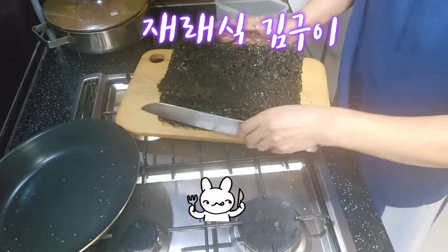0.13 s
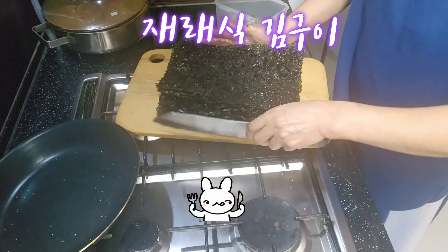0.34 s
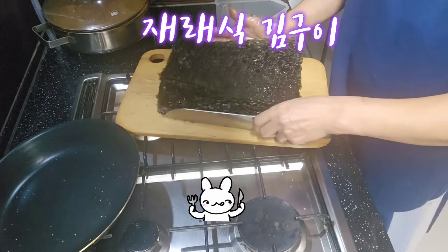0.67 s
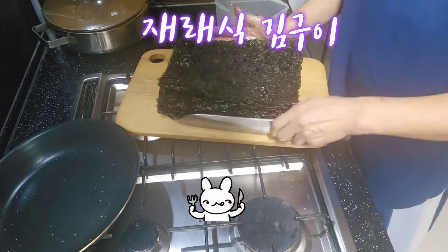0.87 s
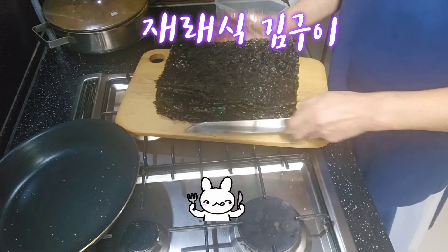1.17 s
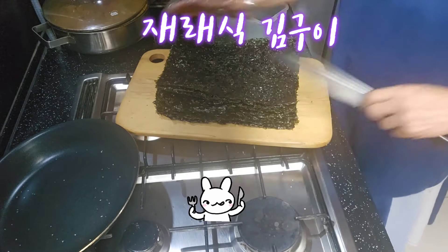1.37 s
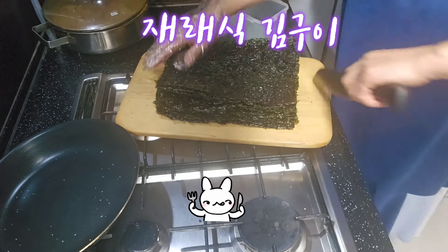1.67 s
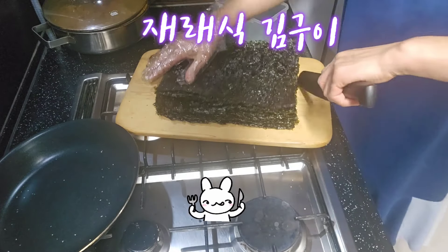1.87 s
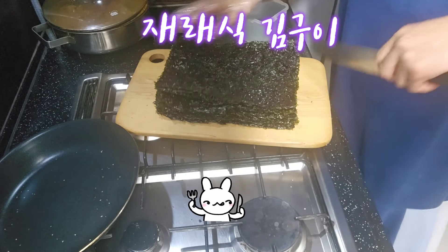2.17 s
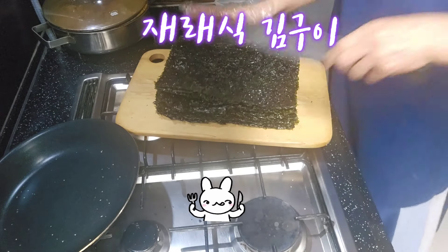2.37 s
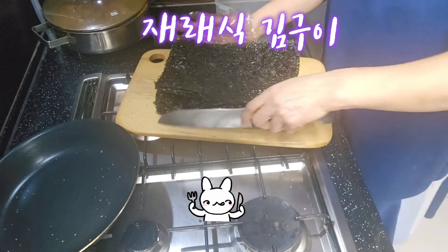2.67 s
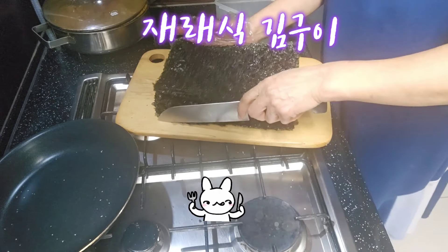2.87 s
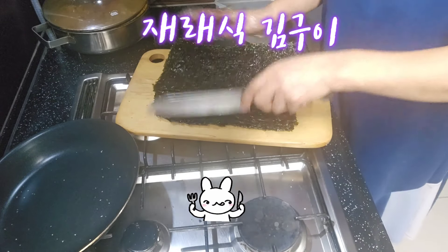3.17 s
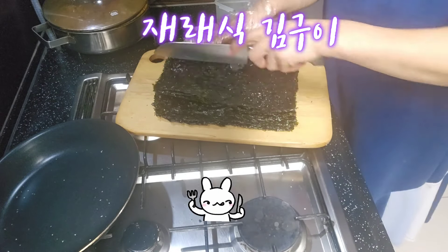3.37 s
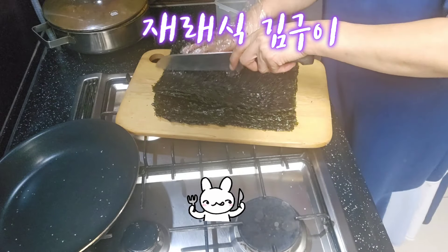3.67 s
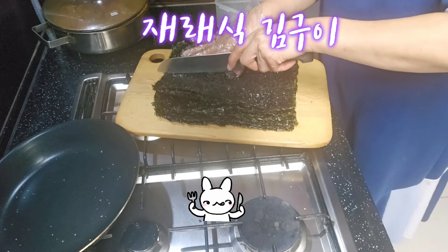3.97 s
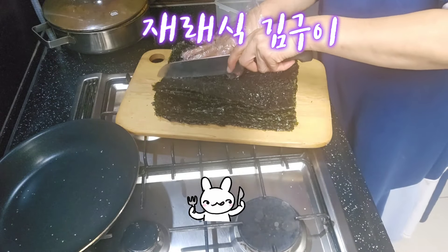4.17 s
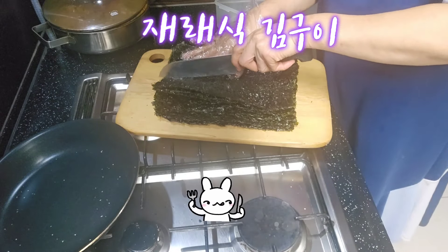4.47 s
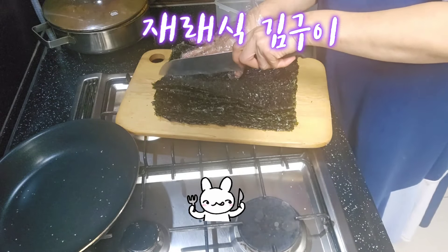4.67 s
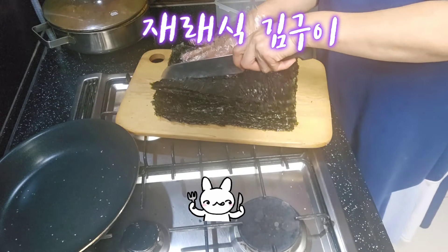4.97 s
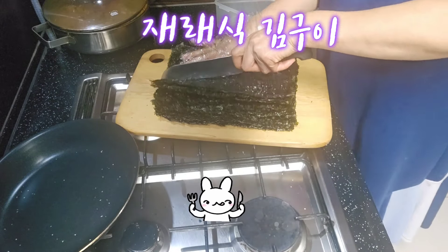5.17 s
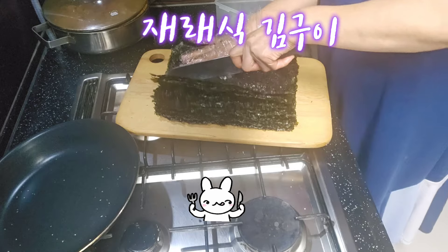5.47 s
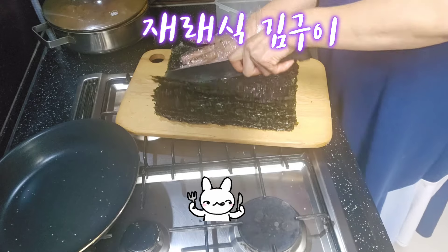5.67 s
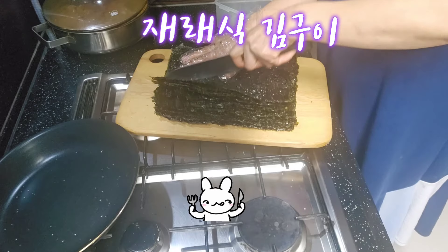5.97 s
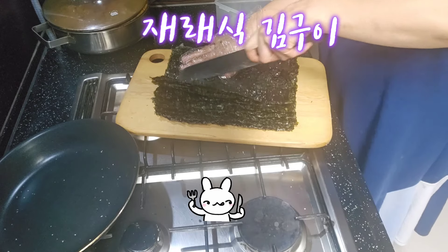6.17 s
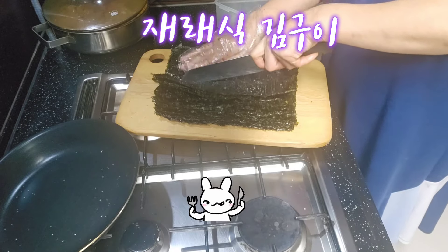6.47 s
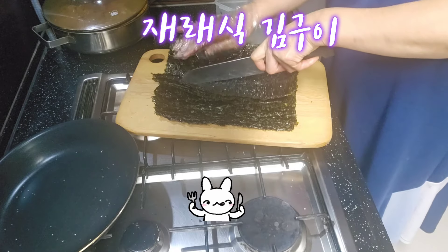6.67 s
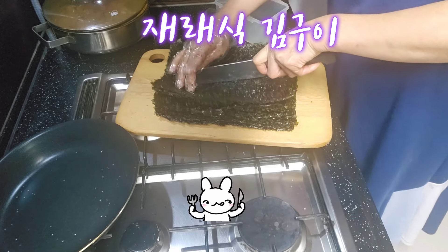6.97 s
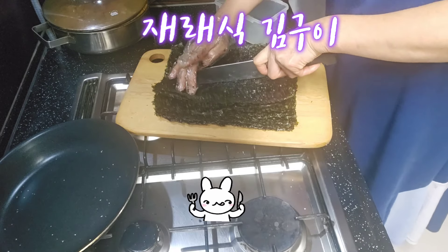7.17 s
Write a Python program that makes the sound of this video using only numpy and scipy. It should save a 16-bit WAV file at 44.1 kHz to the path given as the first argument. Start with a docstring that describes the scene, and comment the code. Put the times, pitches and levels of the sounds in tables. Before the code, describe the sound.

Dry, papery crackling of stacked seaweed sheets, handled and cut on a board, slightly left of nearby microphones. A dull knock lands early, some brief scraping drags follow, then a cluster of hard, hollow knocks peaks before the middle. Afterwards come sparser taps, short crunches and fine clicking snaps, and the blade sings faintly. Low fridge hum and quiet room air lie beneath, with a short, dull kitchen echo.

```python
"""A refrigerator hums in a small kitchen while hands rustle a stack of crisp dry seaweed that a knife cuts.
From the start come knocks, perhaps of pots or by someone else nearby, which ring damped tones in a hard body.
Sheets snap as short noise ticks; from 0.5 s brief narrow tones join in, from 0.7 s a few drags of dense slips.
The hardest knock and crunch come near 2.4 s; from 3.1 s the blade rings faintly four times as a wavering sine.
Fewer knocks follow, while crunches and snaps (random clicks and noise, filtered) go on to the end."""
import sys
import numpy as np
from scipy import signal
from scipy.fft import rfft, irfft, next_fast_len
from scipy.io import wavfile

SR = 44100
rng = np.random.default_rng(int(sys.argv[2]) if len(sys.argv) > 2 else 0)


def wav_out(sig):
    """Save sig, one row per channel (or a flat mono array), as 16-bit PCM at SR to the path in sys.argv[1]."""
    wavfile.write(sys.argv[1], SR, np.round(np.clip(np.atleast_2d(sig).T, -1, 1) * 32767).astype(np.int16))


N = 323253

# room air: (pitch [Hz], relative level [dB per Hz])
AIR_SPECTRUM = [(13, -39.5), (22, -5), (112, 5.5), (140, -10), (169, -12), (236, -1.5), (302, -9),
                (618, -13), (1040, -30), (1380, -23.5), (1760, -30.5), (5460, -34.5), (10300, -46),
                (11500, -32), (16000, -46)]
# steady rustle of hands on the sheets: (time [s], level [dB], lift of the large dull flakes [dB])
HAND_RUSTLE = [(0, -80, 0), (.27, -75.5, 1.5), (.47, -66, -4.5), (.72, -57.5, -0.5), (.92, -73, -6),
               (1.14, -64.5, -1.5), (1.36, -83, 7), (2.0, -75, 4.5), (2.32, -71, 4), (2.64, -62.5, 1),
               (3.2, -71, 0.5), (4.08, -83, -0.5), (4.4, -74, -3.5), (5.0, -79, 1), (5.3, -70, -2),
               (5.72, -73, -1), (5.87, -84.5, 3.5), (5.95, -63, -5), (6.65, -62, -6), (6.72, -67, -4.5),
               (6.95, -64, -6.5), (7.18, -80, -3), (7.33, -68, -5)]
# crunches of the stack: (peak time [s], peak level [dB], fade by 60 dB [s], lift of the large dull flakes [dB])
STACK_CRUNCHES = [(.075, -64.5, .35, 1.5), (.345, -58, .2, -5), (.52, -55.5, .2, -6.5),
                  (.605, -44.5, .3, -4.5), (.845, -51, .35, -4.5), (.965, -57, .5, -1),
                  (1.055, -55.5, .5, -3.5), (1.32, -72.5, .2, 5), (2.155, -54, .3, 3),
                  (2.385, -35.5, 0.15, 12), (2.432, -46.5, .25, 8), (2.762, -48, .15, -9),
                  (2.805, -49.5, .5, 0.5), (2.972, -45.5, .5, -5), (3.09, -54.5, .35, -0.5),
                  (3.325, -50, .5, -3), (3.49, -59, .3, -2), (3.732, -67, .3, -3), (4.115, -61.5, .15, 3),
                  (4.222, -53, .45, -4.5), (4.67, -68.5, 1.2, -2), (5.115, -56.5, .3, 1),
                  (5.19, -45.5, .2, -7.5), (5.28, -55.5, .35, -7.5), (5.407, -53.5, .15, -6.5),
                  (5.518, -51, .15, -9), (5.645, -63, .12, -8.5), (6.468, -53.5, .35, -9),
                  (6.885, -61, .4, -5), (7.09, -65, .3, -8), (7.228, -57, .2, -11), (7.302, -52, .3, -7)]
# colour of the rustle: (pitch [Hz], relative level [dB per Hz])
SHEET_SPECTRUM = [(600, -26.5), (900, -7.5), (1440, -3.5), (2000, -5.5), (3000, -3.5), (4500, -3.5),
                  (5700, -3.5), (7300, -4), (10000, -8.5), (13000, -2.5), (16000, -7)]
# knocks: (time [s], level [dB], favoured pitch [Hz], lift of that pitch [dB],
# then set against the level: thud [dB], low modes [dB], high modes [dB], crack [dB]; rattle fade by 60 dB [s])
# knocks() adds fixed offsets to the levels
KNOCK_EVENTS = [(0.069, -41, 560, 19, -3, -7.5, -11, -26, 0.057),
                (0.328, -59, 1380, 11, -7, -0.5, -24, 1, 0.06),
                (0.49, -51, 686, 4.9, -6, -1, -44, -16, 0.13),
                (0.602, -15, 260, 12.8, -6, -6.5, -17, -25, 0.021),
                (0.766, -42.5, 1440, 15, -7, -20, -3.5, -32, 0.067),
                (0.962, -53, 1450, 6.6, -8, -4, -3, -5, 0.049),
                (1.051, -34, 1800, 7.4, -13, -13, -32, -26, 0.046),
                (1.305, -46.5, 1310, 14, -28, -6, -4.5, -5.5, 0.031),
                (1.544, -51, 550, 10, -24, -14, -18, -7, 0.033),
                (1.656, -49, 1440, 6.3, -29, -7, -17, -28, 0.039),
                (2.052, -29.5, 515, 3.8, -17, -9, -37, -26, 0.078),
                (2.119, -31.5, 1690, 19.6, -15.5, -5.5, -15.5, -24, 0.06),
                (2.379, 3, 1120, 6.1, -35, -12, -14, -18.5, 0.041),
                (2.409, -14, 727, 6.9, -22, -1, -3, -13, 0.036),
                (2.429, -16.5, 664, 5, -16.5, -8.5, -21, -4, 0.037),
                (2.449, -16, 1180, 7.8, -20.5, -10, -10.5, -18, 0.07),
                (2.638, -46.5, 500, 10, 4.5, -3.5, -6, -12.5, 0.036),
                (2.798, -15, 1550, 4.5, -28.5, -12.5, -15.5, -21.5, 0.087),
                (3.223, -29, 619, 4, -22, -13, -27.5, -33, 0.17),
                (4.106, -26, 694, 6.1, -24, -8, -21, -17.5, 0.071),
                (4.116, -37.5, 1440, 10, -0.5, -12, -12, -32.5, 0.059),
                (4.164, -42.5, 518, 11, -2, -8, -17, -10, 0.053),
                (5.12, -25.5, 642, 10, -22.5, -8.5, -22.5, -18.5, 0.083),
                (5.383, -46, 638, 19.2, 4.5, -1.5, -24, -5, 0.028),
                (6.875, -54, 1326, 9, -28, -24.5, -8, -6.5, 0.053)]
# what the knocks and drags set ringing: (pitch [Hz], relative level [dB], fade by 60 dB [s])
BODY_MODES = [(250, -9.5, 0.086), (311, -13.5, 0.09), (434.8, -6.5, .06), (520, -6.5, 0.095),
              (629, -3, 0.074), (727, -4, 0.069), (828, -14.5, 0.12), (918, -4.5, 0.036),
              (1040, -14.5, 0.098), (1170, -3.5, 0.027), (1351, -16, 0.061), (1400, -7.5, 0.055),
              (1474, -9, .035), (1535.6, -2.5, 0.061), (1690, -10, 0.049), (1929, -1, 0.019),
              (2088, -4.5, 0.037), (2330, -4.5, .03), (2546, -11, 0.067), (2940, -19.5, 0.015)]
# the clearest single breaks: (time [s], level before a fixed cut [dB], pitch of the tick [Hz])
CLEAR_SNAPS = [(0.2888, -52, 3500), (0.391, -56, 11600), (0.7206, -40, 5500), (0.839, -43, 11900),
               (0.952, -54, 3820), (1.513, -50, 3930), (1.597, -49.5, 3450), (1.901, -49, 12400),
               (1.9754, -43.5, 5470), (2.1316, -36.5, 4930), (2.757, -45, 12100), (2.9475, -38, 7300),
               (2.967, -38, 6440), (3.314, -39, 7300), (3.41, -46, 5240), (3.573, -48.5, 3160),
               (3.5982, -48.5, 9330), (3.7284, -48, 7500), (4.545, -48, 7500), (4.834, -50, 5410),
               (5.0457, -48.5, 7400), (5.1806, -32.5, 11800), (5.5024, -42, 7700), (5.5168, -39.5, 5610),
               (5.644, -45, 9580), (5.6885, -50, 12500), (5.7216, -45.5, 3260), (5.7782, -49, 4540),
               (6.067, -39.5, 5000), (6.1949, -47, 8000), (6.283, -48, 5980), (6.3275, -47, 7990),
               (6.7346, -50, 5500), (6.8748, -43.5, 7270), (7.222, -42, 11260), (7.2963, -37, 11450)]
# brief narrow tones: (start [s], fade by 60 dB [s], pitch [Hz], level [dB])
NARROW_TONES = [(.492, 0.18, 1400, -50.5), (0.76, 0.16, 1398, -41), (.762, 0.14, 2046, -43),
                (.80, 0.39, 1345, -52.5), (1.054, 0.057, 1790, -35), (1.671, 0.6, 520, -58),
                (1.878, 0.38, 520, -57), (2.119, 0.5, 1587, -39.5), (2.217, 0.4, 211, -33),
                (3.29, 0.28, 7500, -53), (4.115, 0.087, 1436, -28.5), (5.126, 0.11, 1415, -32.5),
                (5.125, 0.1, 690, -30), (5.392, 1.36, 634, -67)]
# something dragged over the worktop: (full at [s], hold [s], fade by 60 dB [s], scrape [dB], rumble [dB])
WORKTOP_DRAGS = [(.72, .27, .3, -65.5, -67.5), (1.03, .04, .8, -64.5, -58), (2.056, .05, .3, -52.5, -45),
                 (2.125, .03, .55, -48, -43.5), (2.352, .01, .1, -44.5, -43.5)]
# the blade sings as it slides: (full at [s], hold [s], fade by 60 dB [s], level [dB])
BLADE_SWELLS = [(3.127, 0.051, .4, -71.5), (4.225, 0.053, 0.62, -60), (6.667, 0.024, 0.094, -66),
                (7.08, .02, 0.078, -72)]
# how alike the two sides are: (pitch [Hz], likeness [0 to 1])
SIDE_LIKENESS = [(60, 0.95), (180, 0.71), (550, .5), (1650, 0.25), (5000, 0.16), (9000, 0.55),
                 (15000, 0.44)]
# phase lag of the right side by pitch: (pitch [Hz], lag [radians])
RIGHT_LAG = [(250, 0), (1100, .6), (2400, 1.3), (4100, 2.9), (6900, 2 * np.pi)]

AIR_DB = -62.5
HUM_HZ, HUM_DB = 119, -67.5
CRUNCH_RISE_SHARE = .4   # climbing 60 dB takes this share of the fading time
PUFF_SAMPLES = 6000   # length of one puff of noise
STRAY_SNAPS = 45   # lesser breaks at random moments
STRAY_OVER_DB, STRAY_SPREAD_DB = 13, 6   # above the steady rustle's level, before the fixed cut
SNAP_T60_S = .028
DRAG_RISE_S = 0.073   # to climb 60 dB
BLADE_HZ, BLADE_RISE_S = 5740, 0.13   # the rise climbs 60 dB
KITCHEN_T60_S, WALL_CUT_HZ, KITCHEN_DB = 0.39, 2000, -13.5   # fading time before the walls dull it
LEFT_DB = 1.54   # left over right: the work lies left of the microphones
PORT_HZ, PORT_T60_S, PORT_DB = 11600, 0.0051, -24.5   # resonance of the microphone ports
CUTOFF_HZ = 15850


def from_db(db):
    """Turn decibels into a gain."""
    return 10 ** (np.asarray(db) / 20)


def rms_one(x):
    """Scale a sound to an average strength (rms) of 1."""
    return x / np.sqrt(np.mean(x ** 2) + 1e-20)


def every_sample(coarse):
    """Fill in a control given at every 40th sample."""
    return np.interp(np.arange(N) / 40, np.arange(len(coarse)), coarse)


def gain_curve(rows, column=1):
    """Join the points of a dB column into a gain at every 40th sample."""
    rows = np.array(rows)
    times = np.arange(0, N + 40, 40) / SR
    return from_db(np.interp(times, rows[:, 0], rows[:, column]))


def swell(full_s, rise_s, hold_s, t60):
    """Gain at every 40th sample: climbs 60 dB in rise_s, holds from full_s on, then dies away."""
    t = np.arange(0, N + 40, 40) / SR - full_s
    rising = -t / rise_s
    fading = np.maximum(t - max(hold_s, 0), 0) / t60
    return from_db(-60 * np.maximum(rising, fading))


def at_hz(points, hz):
    """Read a pitch table, with pitch on a logarithmic scale."""
    points = np.array(points)
    return np.interp(np.log(hz), np.log(points[:, 0]), points[:, 1])


def drift(rate):
    """Slow random wandering (rms 1): noise smoothed by two equal low-passes at rate, in Hz."""
    r = np.exp(-80 * np.pi * rate / SR)
    noise = rng.standard_normal(N // 40 + 2002)
    slow = signal.lfilter([1], [1, -2 * r, r * r], noise)[2000:]   # skip the filter's start-up
    return every_sample(rms_one(slow))


def ring(x, hz, t60):
    """A damped resonance: a unit click sets a sine of height 1 ringing, which fades 60 dB in t60."""
    r, w = from_db(-60 / (t60 * SR)), 2 * np.pi * hz / SR
    return signal.lfilter([0, np.sin(w)], [1, -2 * r * np.cos(w), r * r], x + 1e-18)


def band(x, low_hz, high_hz):
    """Keep mainly the pitches between two limits."""
    return signal.sosfilt(signal.butter(2, [low_hz, high_hz], "band", fs=SR, output="sos"), x + 1e-18)


def grit(per_s, spread_db, size):
    """Random clicks of uneven size and either sign, scaled to rms 1."""
    sizes = from_db(spread_db * np.minimum(rng.exponential(1, size), 5))
    sizes = sizes * rng.choice([-1, 1], size)
    return rms_one(sizes * (rng.random(size) < per_s / SR))


def coloured(white, spectrum):
    """Colour two noises, then mix them as middle and side so the ears hear the wanted likeness."""
    size = next_fast_len(N)
    hz = np.maximum(np.fft.rfftfreq(size, 1 / SR), 10)
    alike = np.clip(at_hz(SIDE_LIKENESS, hz), 0, 1)
    shaped = rfft(white, size) * from_db(at_hz(spectrum, hz))
    mid, side = shaped * np.sqrt([1 + alike, 1 - alike])
    return rms_one(irfft([mid + side, mid - side], size)[:, :N])


def burst(t60, rise_s, count=1):
    """Puffs of noise that rise quickly and die away, each with the energy of its envelope."""
    t = np.arange(PUFF_SAMPLES) / SR
    shape = (1 - np.exp(-t / rise_s)) * np.exp(-np.log(1000) * t / t60)
    puffs = rng.standard_normal((count, PUFF_SAMPLES)) * shape
    return puffs * np.sqrt(np.sum(shape ** 2) / np.sum(puffs ** 2, axis=1, keepdims=True))


def background():
    """Room air is coloured noise; the compressor's hum is a sine that wavers in pitch and level."""
    phase = 2 * np.pi * HUM_HZ * np.arange(N) / SR + 1.1 * drift(3.0)
    hum = np.sqrt(2) * np.sin(phase) * from_db(HUM_DB + 2.5 * drift(2.9))
    air = from_db(AIR_DB) * coloured(rng.standard_normal((2, N)), AIR_SPECTRUM)
    return air + hum


def rustle():
    """Dense tiny fractures in clumps; each size of flake has its own pitch range and its own busy moments."""
    fine = gain_curve(HAND_RUSTLE) ** 2   # powers, so that handling and crunches add up
    dull = fine * gain_curve(HAND_RUSTLE, column=2) ** 2
    for s, db, t60, lift_db in STACK_CRUNCHES:
        power = (from_db(db) * swell(s, CRUNCH_RISE_SHARE * t60, 0, t60)) ** 2
        fine = fine + power
        dull = dull + power * from_db(2 * lift_db)
    fractures = grit(3000, 2.3, (2, 2, N))
    edges_hz = np.geomspace(800, 17000, 13)
    clumps_db = 2.0 * drift(60)   # shared by all flakes
    dull_lift = every_sample(np.sqrt(dull / fine)) * from_db(4)
    flakes = 0
    for k, (low_hz, high_hz) in enumerate(zip(edges_hz, edges_hz[1:])):
        busy = from_db(clumps_db + 2.3 * drift(30))
        lift = dull_lift if low_hz < 5500 else 1
        flakes = flakes + busy * lift * band(fractures[k % 2], low_hz, high_hz)
    sides = coloured(flakes, SHEET_SPECTRUM)
    usual_treble = np.median(np.abs(band(sides, 5800, 17000)))
    return every_sample(np.sqrt(fine)) * from_db(-5.0) * sides / usual_treble


def knocks(rise_s=.003, uneven_db=2.0, apart=0.99):
    """A rattling contact drives damped modes, most those near the favoured pitch; a thud and a crack go with it."""
    drive = np.zeros((len(BODY_MODES) + 2, 2, N + PUFF_SAMPLES))   # the modes, then thud and crack
    hz, mode_db = np.array(BODY_MODES)[:, 0], np.array(BODY_MODES)[:, 1]
    for s, peak_db, favoured_hz, focus_db, thud_db, low_db, high_db, crack_db, rattle_s in KNOCK_EVENTS:
        near_db = focus_db * np.exp(-(np.log2(hz / favoured_hz) / 0.16) ** 2)
        tilt = [(800, low_db + 12.0), (1150, 5), (1550, 4.6), (1950, high_db + 18.5),
                (2300, high_db + 11.0), (3000, crack_db + 17)]
        modes_db = mode_db + near_db + at_hz(tilt, hz) - 33.0
        level_db = np.append(modes_db, [thud_db - 26.5, crack_db + 6]) + peak_db
        level_db += rng.normal(0, uneven_db, len(level_db))
        i = round((s - rise_s / 2) * SR)
        for k, db in enumerate(level_db):
            slow = 4 if k == len(BODY_MODES) else 1   # the thud builds and dies more slowly
            shared, *own = burst(slow * max(rattle_s, .01), slow * rise_s, count=3)
            spread = apart * min(k / 6, 1)   # low modes reach both sides alike
            drive[k, :, i:i + PUFF_SAMPLES] += from_db(db) * (shared + spread * np.array(own))
    drive = drive[..., :N]
    body = sum(ring(drive[k], f, t60) for k, (f, _, t60) in enumerate(BODY_MODES))
    thud_modes = [(62, 0.39), (90, 0.1), (150, 0.063), (210, 0.042), (270, 0.013)]   # (Hz, s to fade 60 dB)
    thud = sum(ring(drive[-2].mean(0), f, t60) for f, t60 in thud_modes)
    crack = band(drive[-1], 1800, 5500)
    return body + band(band(thud, 67, 280), 40, 2000) + crack


def snaps():
    """Single breaks: a broad tick of noise with a short ring at the listed or drawn pitch."""
    out, steady = np.zeros(N + PUFF_SAMPLES), np.array(HAND_RUSTLE)
    when, size, pitch = rng.random((int(STRAY_SNAPS), 3)).T
    stray_s = when * N / SR
    stray_db = np.interp(stray_s, steady[:, 0], steady[:, 1]) + STRAY_OVER_DB + STRAY_SPREAD_DB * (2 * size - 1)
    strays = list(zip(stray_s, stray_db, 3000 * 4 ** pitch))   # 3 to 12 kHz
    for s, level_db, pitch_hz in CLEAR_SNAPS + strays:
        puff = burst(SNAP_T60_S, 0.00036)[0]
        broad = band(puff, pitch_hz / 4.5, min(3.0 * pitch_hz, 20000))
        tick = broad + .15 * ring(puff, pitch_hz, .004)
        out[round(s * SR):][:PUFF_SAMPLES] += from_db(level_db - 4) * tick / np.abs(tick).max()
    return out[:N]


def tones(rise_s=0.005):
    """Each is a slightly unsteady sine that swells fast and dies away."""
    out, unsteady = np.zeros(N), from_db(1.5 * drift(60))
    wander = .8 * drift(40)   # radians; a rubbing contact blurs the pitch
    for s, t60, hz, db in NARROW_TONES:
        i = np.arange(round(s * SR), min(round((s + t60) * SR), N))
        age = (i - i[0]) / SR
        envelope = from_db(db - 60 * age / t60) * (1 - np.exp(-age / rise_s))
        out[i] += envelope * np.sin(2 * np.pi * hz * age + wander[i])
    return out * unsteady


def drags():
    """Dense slips ring the upper modes as a scrape; low noise and band-passed slips make the rumble."""
    slips = grit(1800, 3.0, (2, N))
    scrape = rms_one(sum(from_db(db) * ring(slips, hz, t60) for hz, db, t60 in BODY_MODES[11:]))
    rumble = rms_one(band(rng.standard_normal(N), 60, 220) + 0.23 * band(slips[0], 330, 640))
    levels = sum(swell(s, DRAG_RISE_S, hold_s, t60) * from_db([[scrape_db], [rumble_db]])
                 for s, hold_s, t60, scrape_db, rumble_db in WORKTOP_DRAGS)
    return every_sample(levels[0]) * scrape + every_sample(levels[1]) * rumble


def blade():
    """One slightly unsteady mode of the steel swells, holds and fades."""
    level = sum(from_db(db) * swell(s, BLADE_RISE_S, hold_s, t60) for s, hold_s, t60, db in BLADE_SWELLS)
    unsteady = from_db(2.2 * drift(23))
    phase = 2 * np.pi * BLADE_HZ * np.arange(N) / SR + 0.58 * drift(24)
    return every_sample(level) * unsteady * np.sin(phase)


def right_later(x):
    """Turn each pitch of the right side back by its own phase lag."""
    size = next_fast_len(N)
    hz = np.maximum(np.fft.rfftfreq(size, 1 / SR), 10)
    lag = np.exp(-1j * at_hz(RIGHT_LAG, hz))
    return np.array([x[0], irfft(rfft(x[1], size) * lag, size)[:N]])


def kitchen(x):
    """Echo of the room: eighteen feedback delays a side, duller on every round."""
    size = next_fast_len(N + SR // 2)
    w = 2 * np.pi * np.fft.rfftfreq(size)   # radians per sample
    dull = np.exp(-2 * np.pi * WALL_CUT_HZ / SR)
    wall = (1 - dull) / (1 - dull * np.exp(-1j * w))
    response = np.zeros((2, len(w)), complex)
    for k, lag in enumerate(np.round(rng.uniform(.011, .05, 36) * SR)):
        trip = from_db(-60 * lag / SR / KITCHEN_T60_S) * wall * np.exp(-1j * w * lag)
        response[k % 2] += (-1) ** (k // 2) * trip / (1 - trip)   # all rounds summed
    hz = np.maximum(w * SR / (2 * np.pi), 10)
    alike = np.clip(at_hz(SIDE_LIKENESS, hz), 0, 1) ** 2   # long waves fill both sides alike
    response = alike * response[0] + (1 - alike) * response
    return irfft(rfft(x.mean(0), size) * response, size)[:, :N]


def scene():
    """Rustle, knocks, snaps and drags echo in the kitchen; tones, blade and background are added without echo."""
    near = right_later(rustle() + knocks() + snaps() + drags())
    echo = from_db(KITCHEN_DB) * kitchen(near)
    balance = from_db([[LEFT_DB / 2], [-LEFT_DB / 2]])
    return (background() + near + echo + tones() + blade()) * balance


def record(dry):
    """The ports lift a narrow treble band, the loudest peaks are rounded, the top is cut steeply."""
    heard = dry + from_db(PORT_DB) * ring(dry, PORT_HZ, PORT_T60_S)
    rounded = .95 * np.tanh(heard / .95)
    return signal.sosfilt(signal.ellip(14, .5, 90, CUTOFF_HZ, fs=SR, output="sos"), rounded)


dry = scene()
out = record(dry)
wav_out(out)
```